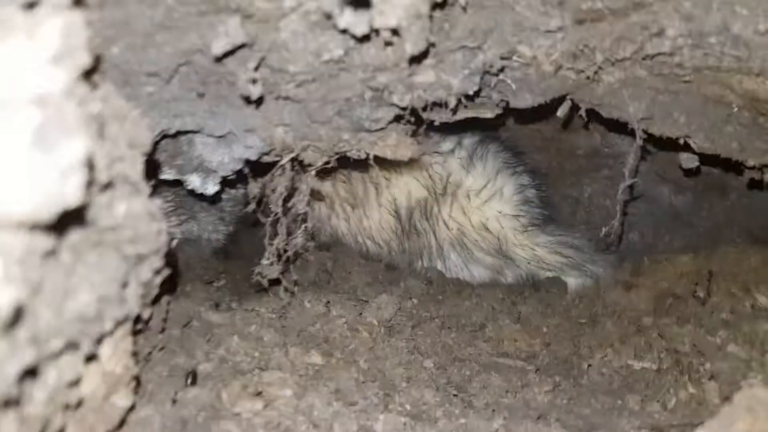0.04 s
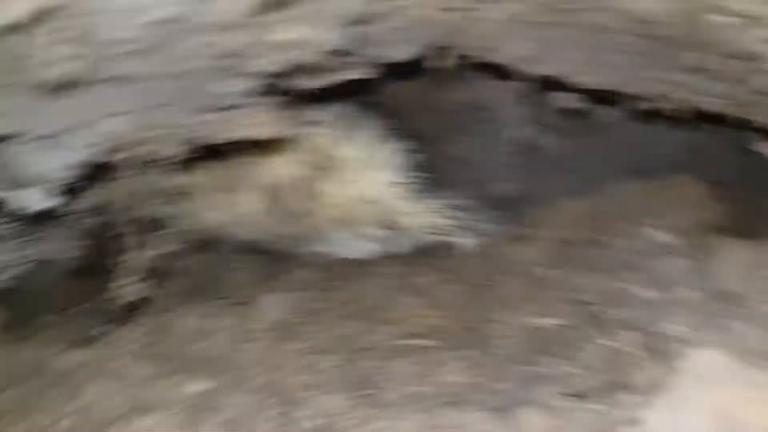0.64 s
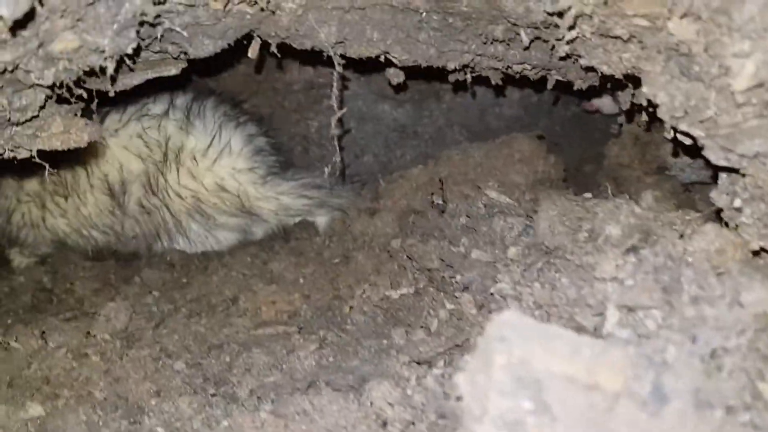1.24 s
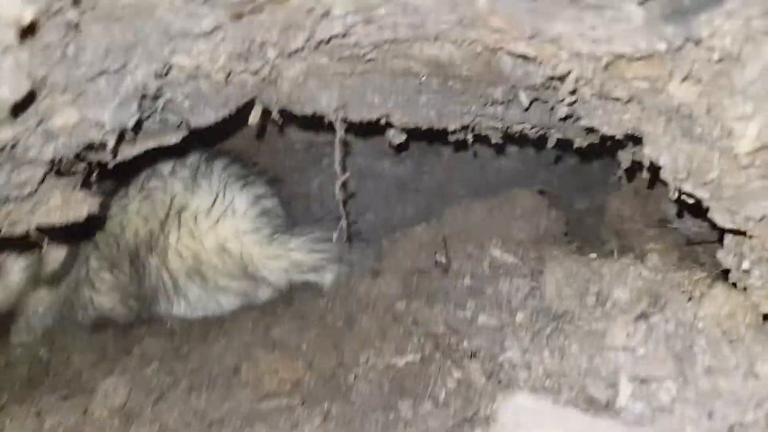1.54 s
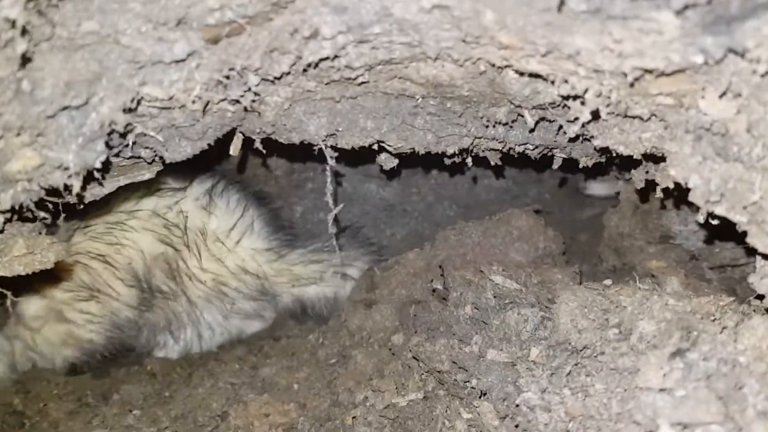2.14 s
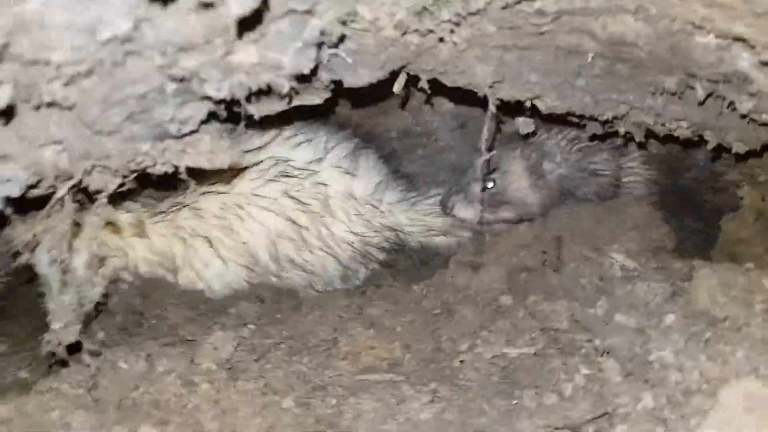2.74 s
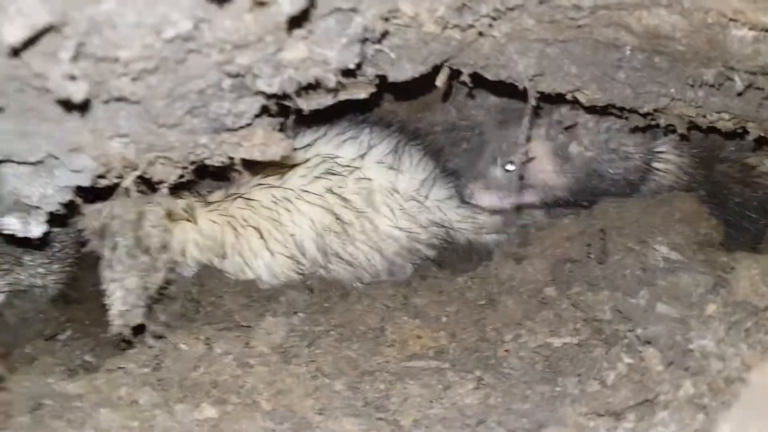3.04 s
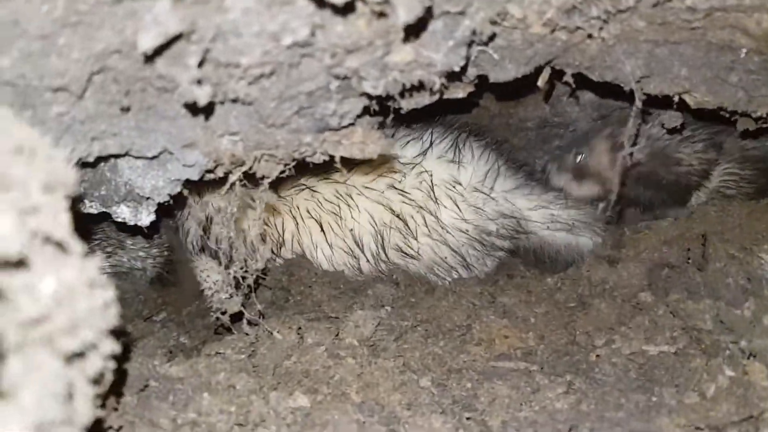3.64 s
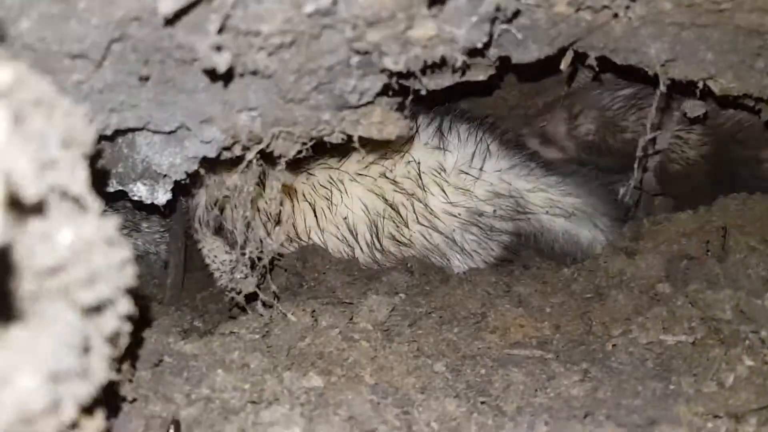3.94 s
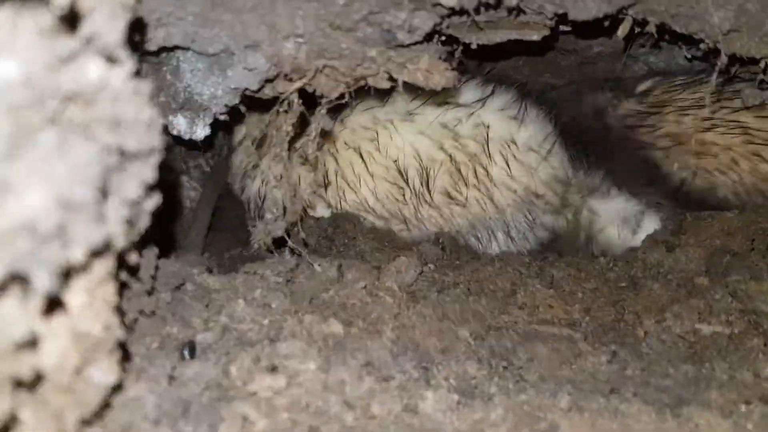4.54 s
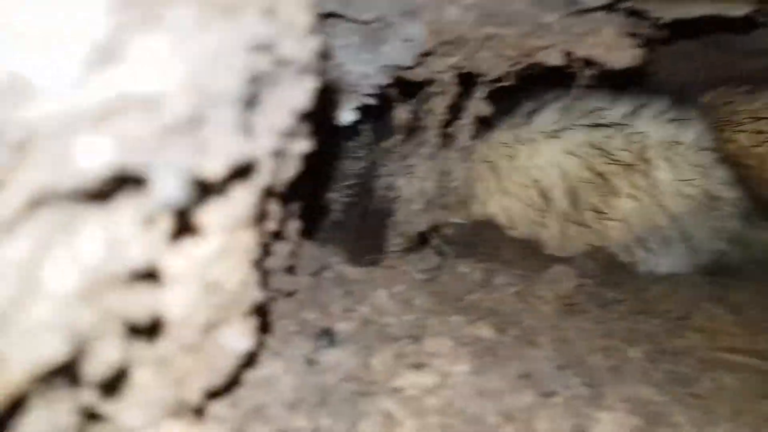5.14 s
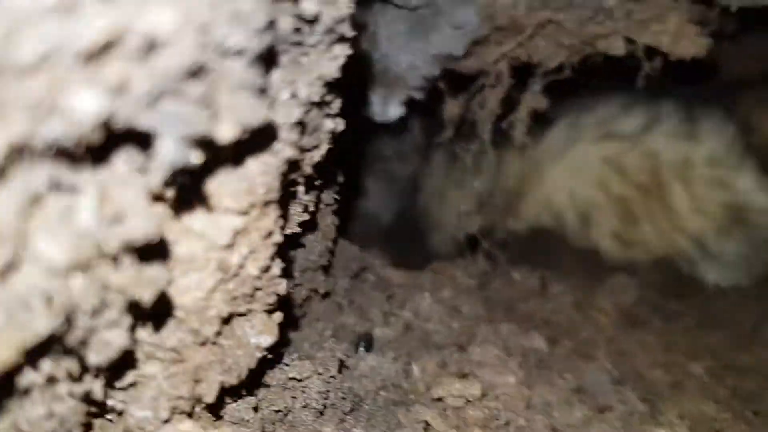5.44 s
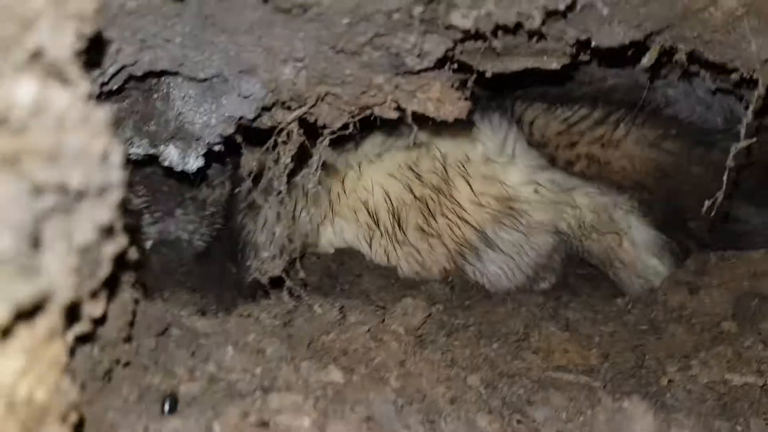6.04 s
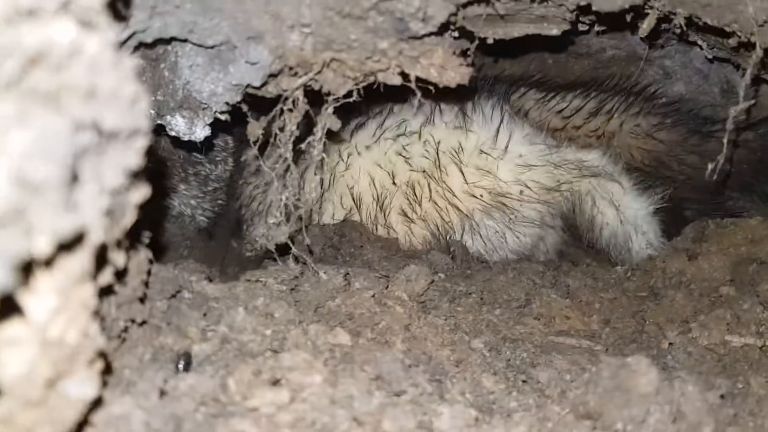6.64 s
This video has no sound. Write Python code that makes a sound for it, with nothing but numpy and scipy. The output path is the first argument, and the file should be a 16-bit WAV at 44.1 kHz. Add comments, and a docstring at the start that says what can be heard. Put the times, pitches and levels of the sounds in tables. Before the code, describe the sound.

Small paws scrabble irregularly in loose dirt, mixed with sharp ticks, light bumps and three short, soft ferret clucks. Then the microphone rubs against the burrow's earth wall, mostly on the left, so that grit rasps, crumbs crack and low thuds shake it, the two loudest near the end. It finishes with faint shuffling. Everything is close and dry, with a thin hiss and low handling rumble underneath.

```python
"""Ferrets in a burrow

Ferrets shuffle through dry, crumbly soil and give three low, muffled clucks. The soil sounds by
granular fracture: many tiny impulses merge into noise. From about 3 s a camera in the burrow's mouth
scrapes along the earth wall on its left: stick-slip friction rasps at that microphone port, crumbs
snap, and impacts rock the casing through low, heavily damped swings."""
import sys
import numpy as np
from scipy import signal
from scipy.fft import rfft, irfft
from scipy.io import wavfile
from scipy.ndimage import uniform_filter1d

SR = 44100
rng = np.random.default_rng(int(sys.argv[2]) if len(sys.argv) > 2 else 0)


def int16_out(signal):
    """Quantize to a 16-bit WAV file."""
    q = np.round(np.clip(np.atleast_2d(signal).T, -1, 1) * 32767)
    wavfile.write(sys.argv[1], SR, q.astype(np.int16))


N = 304731
TIME = np.arange(N) / SR
FREQS = np.fft.rfftfreq(N, 1 / SR)


def amp(db):
    """Amplitude ratio of a level in decibels."""
    return 10 ** (np.asarray(db) / 20)


def unit(x):
    """Normalisation to rms 1."""
    return x / np.sqrt(np.mean(x ** 2) + 1e-20)


def curve(rows):
    """Linear interpolation of (seconds, value) rows at every sample."""
    return np.interp(TIME, *np.transpose(rows))


def spectrum(rows, column=1):
    """Interpolation of one table column over log frequency."""
    rows = np.asarray(rows, float)
    return np.interp(np.log(FREQS + 1), np.log(rows[:, 0]), rows[:, column])


def shaped(x, gain):
    """Linear filtering: each frequency is multiplied by its gain."""
    return irfft(rfft(x) * gain, N)


def rolloff(cutoff_hz, order):
    """Low-pass gain that falls 6 dB per octave per order above the cutoff."""
    return 1 / (1 + (FREQS / cutoff_hz) ** order)


def ports(balance_db):
    """Constant-power panning; balance is the left port's level minus the right's."""
    ratio = amp(np.atleast_1d(balance_db))
    return np.array([ratio, np.ones_like(ratio)]) / np.sqrt(1 + ratio ** 2)


def flutter(rate_hz):
    """Random modulation of rms 1, band-limited to about the given rate."""
    return unit(shaped(rng.standard_normal(N), rolloff(rate_hz, 4)))


def add(mix, start, sound):
    """Superposition of a stereo sound from a start in seconds."""
    part = mix[:, max(round(start * SR), 0):][:, :sound.shape[1]]
    part += sound[:, :part.shape[1]]


def grains(per_s, spread_db, smooth):
    """Shot noise of tiny fractures over smooth friction noise, independent at each port."""
    channels = []
    for _ in range(2):
        size = amp(spread_db * np.minimum(rng.exponential(1, N), 4)) * rng.choice([-1, 1], N)
        fractures = unit(size * (rng.random(N) < per_s / SR))
        channels.append(unit(fractures + smooth * rng.standard_normal(N)))
    return np.array(channels)


def hollows(x, depth_db=2.4):
    """Cavity resonance: gaps between clods change shape, so broad peaks come and go."""
    frames = signal.stft(x, nperseg=256)[2]
    drift = uniform_filter1d(rng.standard_normal(frames.shape[1:]), size=12, axis=1)
    peaks = unit(uniform_filter1d(drift, size=3, axis=0))
    return signal.istft(frames * amp(depth_db * peaks), nperseg=256)[1][:, :N]


def swells(rows, extra_db=0, rise_share=0.56, ends_db=9.5, roundness=2.52):
    """Incoherent strokes add in power; each row begins with peak time, length and level."""
    peak, length, db = np.asarray(rows, float).T[:3, :, None]
    t = TIME[::32]
    offset = (t - peak) / length
    away = np.maximum(-offset / rise_share, offset / (1 - rise_share))  # 0 at the peak, 1 at the ends
    gains = amp(db + np.reshape(extra_db, (-1, 1)) - ends_db * np.minimum(away, 10) ** roundness)
    return np.interp(TIME, t, np.linalg.norm(gains, axis=0))


# Rumble of moving bodies and hands, and faint hiss. Each row: time in seconds, level in dB.
RUMBLE_LEVEL = [(0, -55), (1.3, -57), (2.25, -59.5), (4.2, -53.5), (5.0, -49), (5.9, -59), (6.15, -67),
                (6.45, -73.5), (6.9, -58)]
HISS_LEVEL = [(0, -71), (6.0, -69), (6.25, -79.5), (6.74, -79.5), (6.88, -70.5)]
# Their spectra. Each row: frequency in Hz, relative density in dB.
RUMBLE_SPECTRUM = [(25, 1), (95, 3), (190, -2), (370, -14.5), (550, -22.5), (3000, -59)]
HISS_SPECTRUM = [(300, 3), (1300, -1.5), (4000, 3.5), (6000, -3), (8500, -7.5), (13000, 1), (16000, -4.5)]
# The lower hiss leans left. Each row: frequency in Hz, balance in dB.
HISS_BALANCE = [(5000, 4.5), (9000, -1.5)]


def background(correlation=0.65, lump_db=2.8):
    """Partial coherence: both ports share much of a lumpy rumble, beneath a thin uncorrelated hiss."""
    left, independent = rng.standard_normal((2, N))
    right = correlation * left + np.sqrt(1 - correlation ** 2) * independent
    rumble = shaped(np.array([left, right]), amp(spectrum(RUMBLE_SPECTRUM)))
    lumps = amp(lump_db * flutter(18))
    hiss = shaped(rng.standard_normal((2, N)), amp(spectrum(HISS_SPECTRUM)))
    hiss = shaped(hiss, ports(spectrum(HISS_BALANCE)))
    return unit(rumble * lumps) * amp(curve(RUMBLE_LEVEL)) + unit(hiss) * amp(curve(HISS_LEVEL))


# Paws landing on packed earth. Each row: start in seconds, level in dB.
PAW_PATS = [(0.413, -41), (2.011, -40), (2.045, -37.5), (2.338, -42), (2.883, -45), (3.456, -35.5),
            (6.66, -52)]
# Fur brushing a hollow. Each row: start in seconds, length in seconds, level in dB.
FUR_SCUFFS = [(1.299, .11, -59.5), (3.645, 0.16, -59), (6.867, 0.076, -53)]


def pats_and_scuffs(pat_hz=430, pat_decay_s=0.0012, hollow_hz=450, hollow_q=2.0):
    """Damped resonance: a paw strikes a brief, dull tone, and fur drives a hollow with noise."""
    out, t = np.zeros((2, N)), np.arange(1024) / SR
    pat = np.sin(2 * np.pi * pat_hz * t) * np.exp(-t / pat_decay_s)
    for start, db in PAW_PATS:
        add(out, start, np.tile(amp(db) * pat, (2, 1)))
    detuning = FREQS / hollow_hz - hollow_hz / (FREQS + 1)
    brush = unit(shaped(rng.standard_normal((2, N)), 1 / (1 + (hollow_q * detuning) ** 2)))
    for start, length, db in FUR_SCUFFS:
        out += amp(db) * brush * np.sin(np.pi * np.clip((TIME - start) / length, 0, 1))
    return out


# Loose soil at the ports. Each row: frequency in Hz, left and right relative density in dB.
SOIL_SPECTRUM = [(150, -10, 7.5), (342, 4.5, 3), (746, -9.5, -11), (1100, -2.5, -6.5), (1660, -4.5, -16),
                 (2670, 1.5, -14.5), (4050, -2, -2), (5700, -10.5, -12), (7840, -20.5, -14),
                 (15000, -32.5, -9.5)]
# Paw strokes. Each row: peak time in seconds, length in seconds, level in dB, dust boost in dB.
PAW_STROKES = [(0.171, 0.2, -62.5, 5.5), (0.517, 0.15, -55.5, -7), (.585, 0.06, -50.5, -5.5),
               (0.768, 0.31, -61, -0.5), (0.905, 0.11, -44, -0.5), (1.014, 0.11, -57.5, -11),
               (1.14, 0.15, -56, -7), (1.488, 0.049, -51.5, 4), (1.56, 0.038, -49, 2),
               (1.688, 0.098, -60.5, -0.5), (2.534, 0.086, -39.5, -13.5), (2.808, 0.048, -60.5, 0),
               (6.84, 0.13, -72.5, -12)]


def scrabble(clump_db=3.1, dust_hz=7000):
    """Granular flow: soil yields to the paws in clumps and reaches the two ports by different paths."""
    drive = grains(per_s=1900, spread_db=4.5, smooth=0.9) * amp(clump_db * flutter(55))
    colour = amp([spectrum(SOIL_SPECTRUM, column=1), spectrum(SOIL_SPECTRUM, column=2)])
    soil = unit(shaped(hollows(drive), colour))
    dust = shaped(soil, 1 - rolloff(dust_hz, 10))
    dust_db = np.array(PAW_STROKES)[:, -1]
    return (soil - dust) * swells(PAW_STROKES) + dust * swells(PAW_STROKES, dust_db)


# Claws in packed soil. Each row: start in seconds, length in seconds, level in dB, balance in dB.
CLAW_DRAGS = [(0.843, 0.095, -48, 7), (2.492, 0.082, -43.5, 5), (5.025, 0.095, -42.5, 22)]


def claws(from_hz=4150, to_hz=2260, bandwidth_hz=2000):
    """Swept resonance: a dragged claw breaks grains, which ring its furrow at a sinking pitch."""
    out, pole = np.zeros((2, N)), np.exp(-np.pi * bandwidth_hz / SR)
    for start, length, db, balance_db in CLAW_DRAGS:
        n = round(length * SR)
        carrier = np.exp(2j * np.pi * np.cumsum(np.geomspace(from_hz, to_hz, n)) / SR)
        fractures = rng.laplace(size=(2, n)) * rng.exponential(size=(2, n))
        # shifting down, low-passing and shifting back centres the resonance on the carrier
        ring = (carrier * signal.lfilter([1], [1, -2 * pole, pole ** 2], fractures / carrier)).real
        add(out, start, amp(db) * ports(balance_db) * unit(ring) * signal.windows.tukey(n, 1 / np.pi))
    return out


# Ferret calls. Each row: start in seconds, length in seconds, level in dB, starting pitch in Hz.
CLUCKS = [(0.97, 0.079, -39.5, 163.4), (2.301, 0.075, -41.5, 151), (3.401, 0.095, -41.5, 167.6)]


def clucks(fall_share=0.278, overtone_db=-19, roughness=0.2):
    """Absorption: soil weakens the overtones of soft, unsteady calls that sag in pitch."""
    out, tremble = np.zeros((2, N)), flutter(160)
    for start, length, db, hz in CLUCKS:
        n = round(length * SR)
        shake = roughness * tremble[round(start * SR):][:n]
        pitch = hz * (1 - fall_share * np.linspace(0, 1, n) + shake / 2)
        phase = 2 * np.pi * np.cumsum(pitch) / SR
        tone = np.sin(phase) + amp(overtone_db) * (np.sin(2 * phase) + 0.5 * np.sin(3 * phase))
        envelope = (1 + shake) * signal.windows.tukey(n, 0.45)
        add(out, start, np.tile(amp(db) * tone * envelope, (2, 1)))
    return out


# Snapping crumbs and sharp contacts. Each row: time in seconds, level in dB, pitch in Hz, balance in dB.
CRUMB_SNAPS = [(0.1867, -43, 4500, -20), (0.4127, -40, 3340, 16), (.515, -39.5, 1900, 18),
               (0.6852, -38.5, 2330, 23), (0.7335, -32.5, 3200, 17), (0.8138, -34.5, 2370, 16),
               (.8945, -39.5, 2240, 16), (1.188, -42.5, 8800, -22), (1.4621, -23, 2920, 14),
               (1.6038, -45.5, 3000, 9), (2.01, -47, 7660, -4), (2.069, -51.5, 6360, 7),
               (2.5132, -36, 3850, 4), (2.549, -38, 2870, 5.5), (2.5639, -37, 2700, 16),
               (3.0772, -32, 4200, 39), (3.934, -22.5, 2930, 30.5), (4.115, -24.5, 3500, 24),
               (4.211, -36, 5230, 32), (4.2454, -33, 5440, 35), (4.2778, -34.5, 5960, 39),
               (4.3265, -32, 4350, 40), (4.359, -36, 3340, 19), (4.375, -23.5, 2870, 10.5),
               (4.415, -31.5, 2860, 15), (4.457, -34.5, 1700, 10), (4.481, -33, 2300, 9),
               (4.6124, -25, 3460, 35), (4.864, -35.5, 11000, 25), (4.882, -28.5, 2000, 17),
               (4.8956, -33, 4660, 32), (4.9146, -23.5, 1460, 29.5), (4.92, -21, 1447, 32.5),
               (4.9332, -16.5, 1834, 31), (4.987, -41, 4200, 10), (5.183, -10.5, 2030, 19),
               (5.3202, -35, 670, 14), (5.4169, -39, 3160, 18), (5.5972, -18.5, 1900, 10.5),
               (5.6022, -12, 860, 30.5), (5.6105, -23, 2690, 24), (5.6125, -22, 593, 31.5),
               (5.619, -19.5, 498.5, 32.5), (6.0095, -22.5, 2520, 8.5), (6.277, -50, 2130, 18),
               (6.592, -61, 2740, 12.5), (6.788, -56, 3640, 21)]
# The port's response to the snaps. Each row: frequency in Hz, gain in dB.
SNAP_RESPONSE = [(800, 4), (1650, -7.5), (2300, -4.5), (3200, -2.5), (6000, 2.5), (8500, -9), (13000, 1.5)]


def snaps(crunch_db=-15, crunch_s=0.0014, ring_s=0.00019, echo_db=-9, echo_s=0.0021,
          crack_db=-10, crack_s=0.00065, trickle_db=-24, trickle_s=0.011):
    """Brittle fracture: a crumb crunches, snaps with a damped swing that clods reflect, and trickles."""
    lead, echo_taps = 256, 256  # samples
    out, t = np.zeros((2, N)), np.arange(-lead, 2048) / SR
    after = np.maximum(t, 0)
    crunch = amp(crunch_db) * np.exp(-abs(t) / crunch_s)
    debris = amp(crack_db) * np.exp(-after / crack_s) + amp(trickle_db) * np.exp(-after / trickle_s)
    noise_envelope = np.where(t < 0, crunch, debris)
    for time, db, hz, balance_db in CRUMB_SNAPS:
        decay_s = ring_s * np.sqrt(2000 / hz)  # smaller crumbs ring higher and die sooner
        swing = np.sin(2 * np.pi * hz * after) * after * np.exp(-after / decay_s)
        swing /= np.sqrt(np.sum(swing ** 2) / 88)  # the energy of 2 ms at rms 1
        echoes = rng.standard_normal((2, echo_taps)) * np.exp(-np.arange(echo_taps) / SR / echo_s)
        echoes *= amp(echo_db) / np.linalg.norm(echoes, axis=1, keepdims=True)
        snap = swing + signal.fftconvolve(swing[None], echoes, axes=1)[:, :len(t)]
        band = signal.butter(1, [min(hz * 0.61, SR / 8), min(hz * 1.7, SR / 3)], "band", fs=SR)
        noise = unit(signal.lfilter(*band, rng.laplace(size=(2, len(t)))))
        add(out, time - lead / SR, amp(db) * ports(balance_db) * (snap + noise * noise_envelope))
    return shaped(out, amp(spectrum(SNAP_RESPONSE)))


# Shoves of the casing along the wall.
# Each row: peak time in seconds, length in seconds, level in dB, coarseness of the crumbs in dB.
SHOVES = [(3.173, 0.1, -46, 0), (3.29, 0.026, -47.5, -3), (3.692, 0.055, -44, 0.5), (3.92, 0.1, -35, -2),
          (4.099, 0.097, -31, -0.5), (4.175, 0.11, -41.5, -5.5), (4.478, 0.079, -45.5, -2),
          (4.52, 0.088, -74.5, 28), (4.613, 0.027, -35.5, 1.5), (4.726, .055, -46.5, 4),
          (4.798, 0.06, -42, 6.5), (4.892, 0.16, -48, 5), (4.923, 0.028, -22, -1), (5.072, 0.078, -48, -27),
          (5.188, 0.047, -36, 3), (5.256, 0.18, -43, 2), (5.473, 0.11, -52.5, -19),
          (5.629, 0.075, -40.5, 6), (5.739, 0.069, -50, 1.5), (5.86, 0.096, -45, -4),
          (5.935, 0.1, -55, 3.5), (6.133, 0.1, -66, 1)]
COARSENESS_DB = np.array(SHOVES)[:, -1]
# Light rubbing between the shoves. Each row: time in seconds, level in dB.
RUBBING_LEVEL = [(3.05, -76), (3.12, -58), (3.6, -67.5), (4.2, -55), (4.98, -55.5), (5.4, -63.5),
                 (5.95, -61), (6.3, -76.5)]


def friction(extra_db=0):
    """Power summation: shoves and light rubbing together set the envelope of the wall's rasp."""
    touching = (TIME > RUBBING_LEVEL[0][0]) & (TIME < RUBBING_LEVEL[-1][0])
    return np.hypot(swells(SHOVES, extra_db), amp(curve(RUBBING_LEVEL)) * touching)


# Grit rasping on the casing. Each row: frequency in Hz, relative density in dB.
GRIT_SPECTRUM = [(120, -14), (280, -2), (600, -5.5), (1200, -9), (1800, -5.5), (2500, 3), (3600, 3),
                 (6300, -2), (8300, -9.5), (12000, -8), (16000, -12.5)]
# The rasp is louder at the left port. Each row: time in seconds, balance in dB.
SCRAPE_BALANCE = [(3.1, 41), (4.0, 45), (4.45, 12), (4.9, 26), (5.45, 8.5), (6.1, 9)]


def scrape(slip_db=2.44, crumbs_hz=1700, crumbs_db=-0.5, dust_hz=7400, dust_db=-10, dust_loss=0.41):
    """Stick-slip friction of the casing on grit; coarser crumbs give more body and less fizz."""
    drive = grains(per_s=3200, spread_db=4.0, smooth=0.45) * amp(slip_db * flutter(50))
    rasp = shaped(hollows(drive), amp(spectrum(GRIT_SPECTRUM)))
    low, high = rolloff(crumbs_hz, 6), 1 - rolloff(dust_hz, 20)
    crumbs = amp(crumbs_db) * unit(shaped(rasp, low)) * friction(COARSENESS_DB)
    grit = unit(shaped(rasp, 1 - low - high)) * friction()
    dust = amp(dust_db) * unit(shaped(rasp, high)) * friction(-dust_loss * COARSENESS_DB)
    return (crumbs + grit + dust) * ports(curve(SCRAPE_BALANCE))


# Soft bumps on the earth. Each row: peak time in seconds, length in seconds, level in dB, balance in dB.
BUMPS = [(0.148, 0.099, -46, 6), (0.519, 0.018, -40, 0), (2.588, 0.072, -43.5, 6), (4.569, 0.15, -35, 9),
         (4.681, 0.082, -38.5, 14), (5.202, 0.13, -29, 9), (5.313, 0.074, -33.5, 14),
         (5.448, 0.072, -46.5, 1)]


def judder(casing_hz=125, q=0.98, top_hz=380, shove_db=-1, coarse_slope=0.4, shove_balance_db=18):
    """Forced vibration: every shove and soft bump drives the casing's low, broad resonance."""
    resonance = 1 / (1 + 1j * q * (FREQS / casing_hz - casing_hz / (FREQS + 1)))
    drive = grains(per_s=760, spread_db=0, smooth=0.24)
    vibration = unit(shaped(drive, resonance * rolloff(top_hz, 4)))
    shoved = swells(SHOVES, shove_db + coarse_slope * COARSENESS_DB) * ports(shove_balance_db)
    bumped = sum(swells([row]) * ports(row[-1]) for row in BUMPS)
    return vibration * np.hypot(shoved, bumped)


# Blows on the casing.
# Each row: start in seconds, thud level in dB, pitch in Hz, balance in dB, dust spray level in dB.
KNOCKS = [(0.686, -30, 132, -19, -41.5), (.732, -25, 131, -14, -38), (.811, -28, 121, -12, -37.5),
          (1.458, -26, 111, -6, -37.5), (1.55, -29, 114, -24, -42), (2.413, -33, 149, -11, -48.5),
          (2.433, -30, 129, -20, -48.5), (4.198, -21.5, 83, 24, -60), (4.412, -30, 110, -11, -41),
          (4.609, -20.5, 101, 37, -37), (4.915, -18, 98, 14, -57), (4.933, -9.5, 151, 23, -61),
          (5.1844, -3, 135, 29, -52), (5.6035, 0, 93, 28, -61), (5.614, -11, 100, 31, -62)]


def knocks(decay_cycles=0.46, rise_s=0.0003, spray_s=0.0052, spray_hz=7000, crunch_db=-3, crunch_hz=750):
    """Damped free vibration: a blow rocks the casing once or twice, crushes earth and sheds dust."""
    out, t = np.zeros((2, N)), np.arange(4096) / SR
    rise = 1 - np.exp(-t / rise_s)
    burst = np.exp(-t / spray_s) * rise
    spray_band = signal.butter(1, spray_hz, "high", fs=SR)
    crunch_band = signal.butter(1, [crunch_hz / 2, crunch_hz * 2], "band", fs=SR)
    for start, db, hz, balance_db, spray_db in KNOCKS:
        thud = np.sin(2 * np.pi * hz * t + np.pi / 4) * np.exp(-t * hz / decay_cycles) * rise
        spray = unit(signal.lfilter(*spray_band, rng.standard_normal((2, len(t))))) * burst
        crunch = unit(signal.lfilter(*crunch_band, rng.standard_normal((2, len(t))))) * burst
        add(out, start, ports(balance_db) * (amp(db) * thud + amp(spray_db) * spray))
        # the crunch is airborne and always favours the left port
        add(out, start, ports(abs(balance_db) / 2) * amp(spray_db + crunch_db) * crunch)
    return out


def scene():
    """Superposition: the sources add with no reverberation, since earth walls absorb sound."""
    return (scrabble() + claws() + scrape() + judder() + snaps() + knocks()
            + pats_and_scuffs() + clucks() + background())


def record(dry, bass_hz=28, top_hz=15900):
    """Band limiting and overload: the microphone sheds deep bass, clips, then loses the top treble."""
    heard = signal.lfilter(*signal.butter(1, bass_hz, "high", fs=SR), dry)
    low_pass = signal.firwin(401, top_hz, window=("kaiser", 8), fs=SR)
    return signal.oaconvolve(np.clip(heard, -1, 1), low_pass[None], "same")


dry = scene()
out = record(dry)
int16_out(out)
```